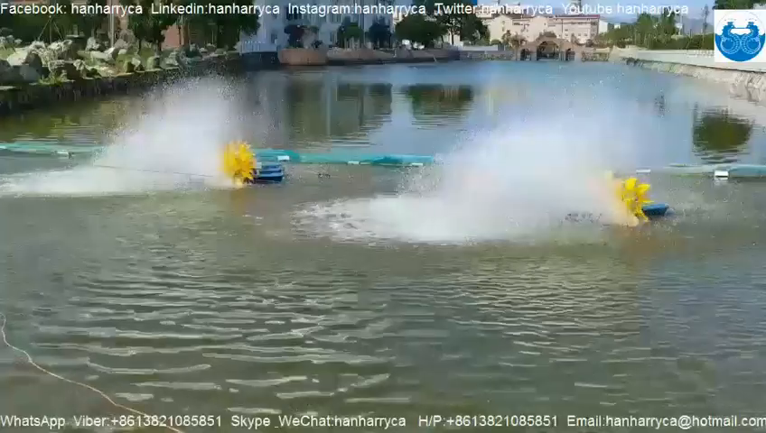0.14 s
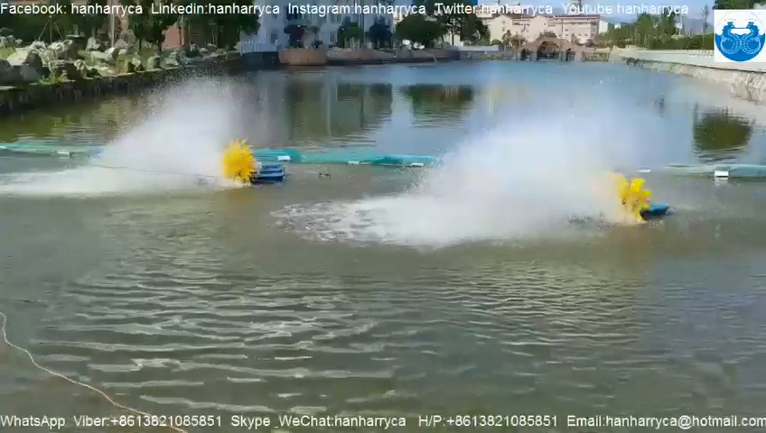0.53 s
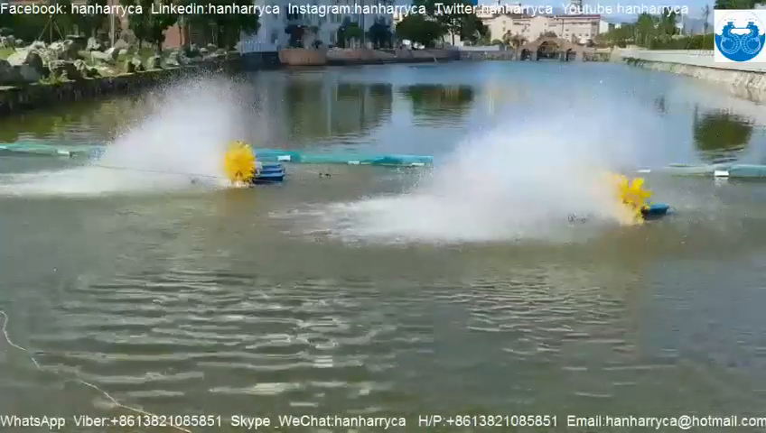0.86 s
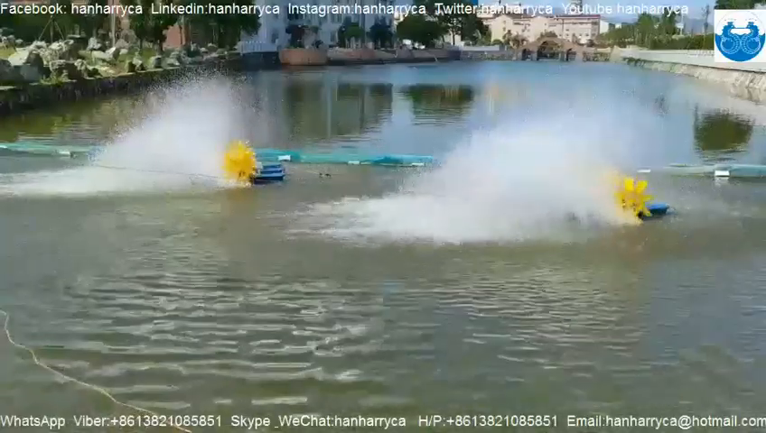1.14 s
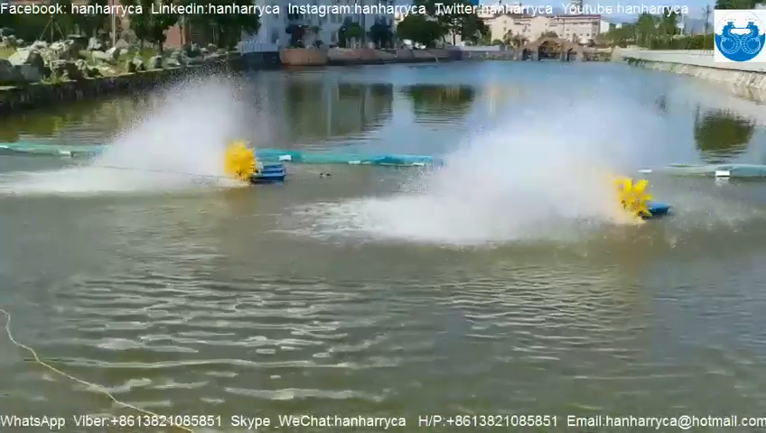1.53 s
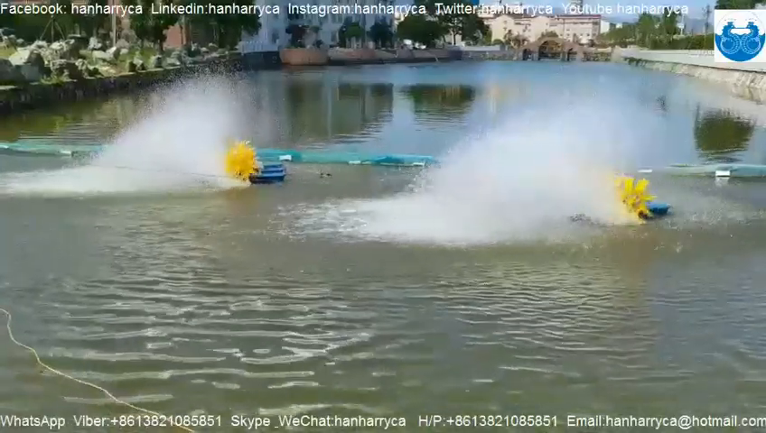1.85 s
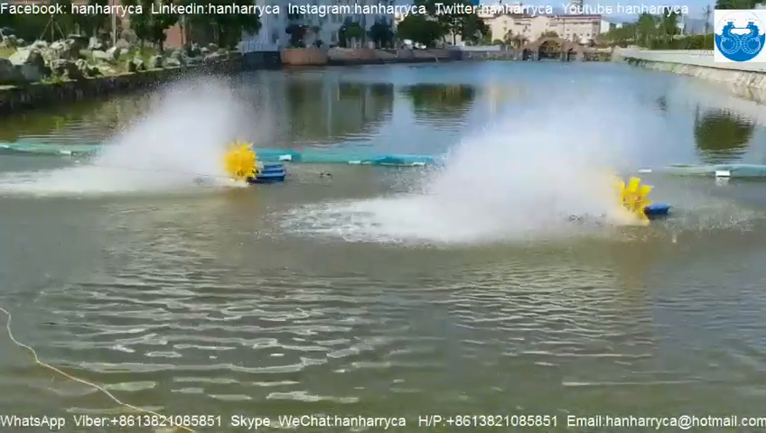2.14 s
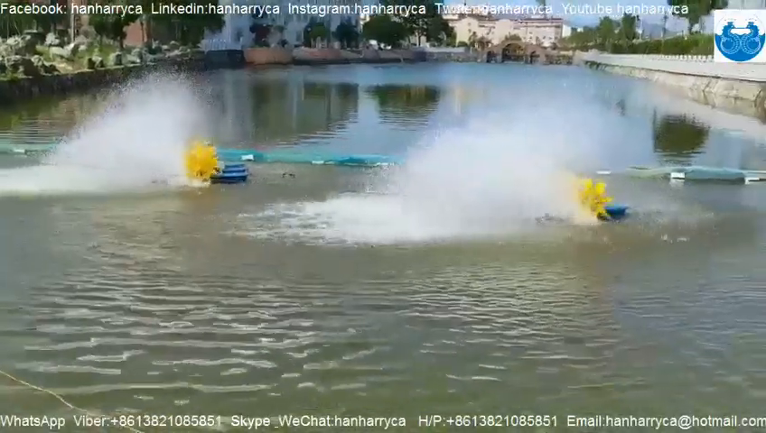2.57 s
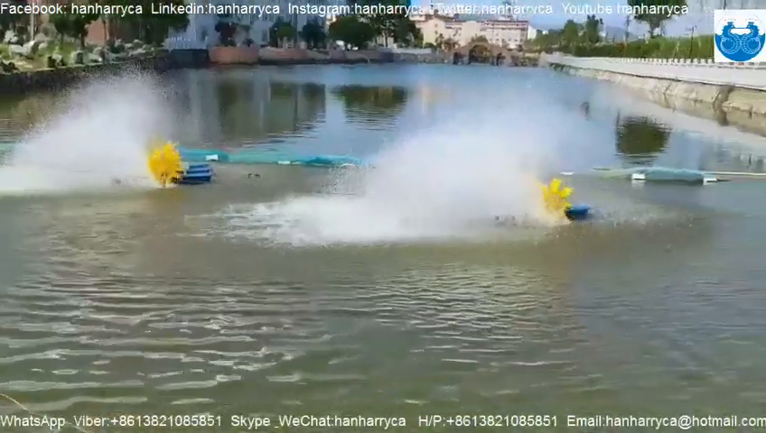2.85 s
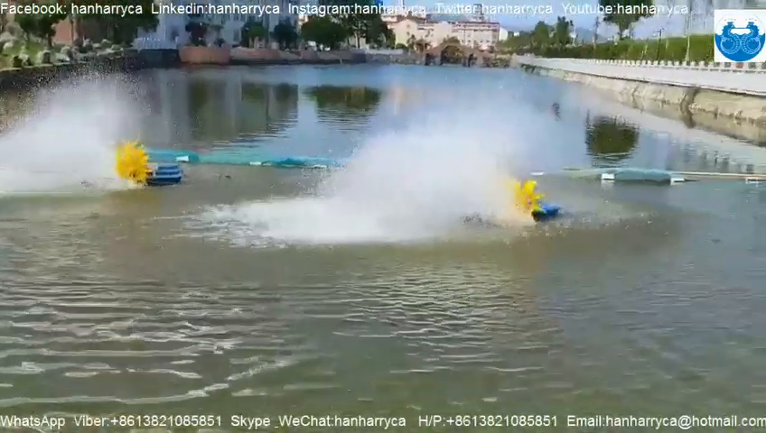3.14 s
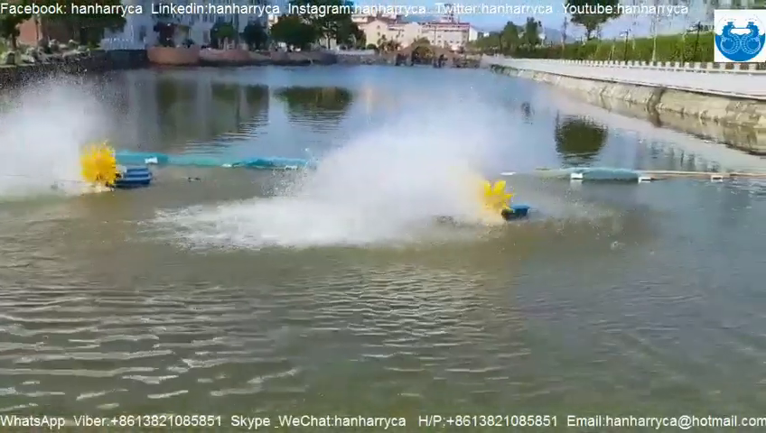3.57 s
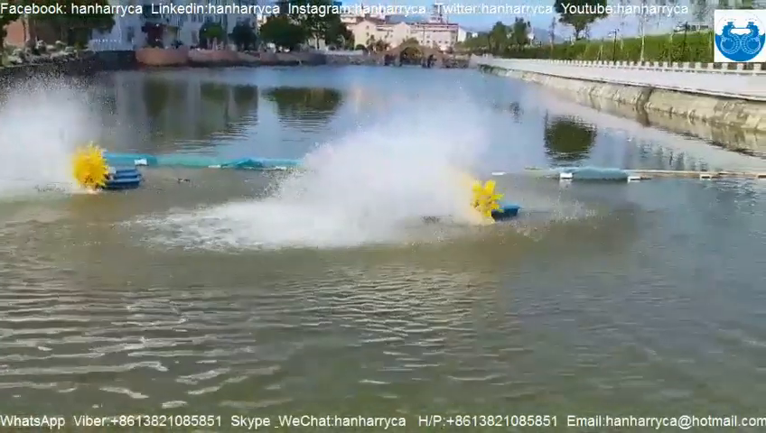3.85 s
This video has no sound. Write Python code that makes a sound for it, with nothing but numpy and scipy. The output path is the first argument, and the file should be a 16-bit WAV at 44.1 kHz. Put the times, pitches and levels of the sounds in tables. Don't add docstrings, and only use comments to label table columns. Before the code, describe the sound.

Splashing water from two paddle wheels: near silence until about 0.25 s, then a quick fade-in by 0.33 s to a dense, wide, bright hiss of falling spray. It is loudest at first, easing down until about 1.5 s, then holding steady with small flutters to 4 s. Fine drop ticks, ringing bubbles and hollow mid-pitched churning mingle over low wash and very faint motor hum, outdoors, a few metres away.

```python
import sys
import numpy as np
from scipy import signal
from scipy.fft import rfft, irfft
from scipy.io import wavfile
from scipy.ndimage import uniform_filter1d, map_coordinates

SR = 44100
rng = np.random.default_rng(int(sys.argv[2]) if len(sys.argv) > 2 else 0)


def elevation(decibels):
    levels = np.asarray(decibels, float)
    return 10 ** (levels / 20)


def inscribe(sig):
    pcm = np.round(np.clip(np.atleast_2d(sig).T, -1, 1) * 32767)
    wavfile.write(sys.argv[1], SR, pcm.astype(np.int16))


N = 176400


def rms_one(x):
    return x / np.sqrt(np.mean(x ** 2) + 1e-20)


def at_hz(points, hz):
    table_hz, value = np.transpose(points)
    return np.interp(np.log(hz), np.log(table_hz), value)


def drift(rate_hz, count=1):
    hop, warm_up = 40, 2000
    r = np.exp(-2 * np.pi * rate_hz * hop / SR)
    noise = rng.standard_normal((count, N // hop + warm_up + 2))
    slow = signal.lfilter([1], [1, -2 * r, r * r], noise)[:, warm_up:]
    rows = []
    for row in slow:
        level = rms_one(row - uniform_filter1d(row, 350))
        rows.append(np.interp(np.arange(N) / hop, np.arange(len(row)), level))
    return np.array(rows)


def resonance(x, hz, width_hz):
    r = np.exp(-np.pi * width_hz / SR)
    zeros = [(1 - r * r) / 2, 0, (r * r - 1) / 2]
    poles = [1, -2 * r * np.cos(2 * np.pi * hz / SR), r * r]
    return signal.lfilter(zeros, poles, x + 1e-18)


def placed(x, lag_ms):
    turn = np.exp(-2j * np.pi * np.fft.rfftfreq(N, 1 / SR) * lag_ms / 1000)
    return np.array([x, irfft(rfft(x) * turn, N)])


def bands(white, low_hz, count):
    edges_hz = low_hz * 2 ** (np.arange(count + 1) / 5)
    for k, (low, high) in enumerate(zip(edges_hz, edges_hz[1:])):
        sos = signal.butter(2, [low, high], "band", fs=SR, output="sos")
        yield np.sqrt(low * high), signal.sosfilt(sos, white[k % 2])


# freq_hz, density_db_per_hz
SPRAY_SPECTRUM = [(250, -5), (700, -6), (1300, 0.5), (2500, -3.5), (5000, 1.5), (8000, -0.5), (12000, -1),
                  (16000, -3.5)]
# freq_hz, share_0_to_1
DIRECT_SHARE = [(200, .6), (1000, .7), (3000, .65), (6000, .4), (15000, .25)]
# right_lag_ms, level_db
WHEEL_PLACES = [
    (.31, 0),
    (.21, -3.0),
]
# freq_hz, level_db
SIDE_TILT = [(300, -0.2), (5000, 0.1), (8000, -2), (10500, -2), (15500, -3)]


def spray(fine_db_per_oct):
    level_db, sheet_db, fleck_db, fleck_rise_db, speck_db = 3.5, 1.0, 0.94, 0.5, 1.76
    direct = []
    for _ in range(2):
        direct.append(sum(elevation(db) * placed(rng.standard_normal(N), lag_ms) for lag_ms, db in WHEEL_PLACES))
    scattered = rng.standard_normal((2, 2, N))
    white = np.concatenate([rms_one(np.array(direct)), scattered], axis=1)
    sheets, flecks, out = drift(15.0, count=2), drift(8.0, count=2), 0
    for hz, band in bands(white, 260, 31):
        share = at_hz(DIRECT_SHARE, hz)
        bright = np.log2(hz / 200) / 5
        flecks = .8 * flecks + .6 * drift(8.0, count=2)
        swing_db = sheet_db * sheets * bright + (fleck_db + fleck_rise_db * bright) * flecks
        swing_db = swing_db + speck_db * drift(27.0, count=2)
        colour_db = at_hz(SPRAY_SPECTRUM, hz) + fine_db_per_oct * np.log2(hz / 4500)
        colour_db = colour_db + at_hz(SIDE_TILT, hz) / 2 * np.array([[1], [-1]])
        mix = np.sqrt(share) * band[:2] + np.sqrt(1 - share) * band[2:]
        out = out + elevation(colour_db + swing_db) * mix
    return elevation(level_db) * rms_one(out)


def ripples(x):
    delay_ms, sway_ms, sway_hz, echo_db = 5.5, .22, 3.0, -9
    lag_ms = delay_ms * np.array([[1], [1.25]]) + sway_ms * drift(sway_hz, count=2)
    lag = lag_ms * SR / 1000
    echo = [map_coordinates(side, [np.arange(N) - late], order=3) for side, late in zip(x, lag)]
    return (x + elevation(echo_db) * np.array(echo)) / np.sqrt(1 + elevation(2 * echo_db))


# freq_hz, width_hz, level_db
ECHO_RINGS = [
    (505, 190, -5),
    (922, 132, -1),
    (1411, 250, -6.5),
    (2274, 680, -8.5),
    (3230, 210, -18),
]


def churn():
    level_db, patchy_db = -7, 1.76
    out = 0
    for k, (hz, width_hz, db) in enumerate(ECHO_RINGS):
        pole_hz = 1.54 * width_hz
        ring = resonance(resonance(rng.standard_normal(N), hz, pole_hz), hz, pole_hz)
        out = out + (-1) ** k * elevation(db + patchy_db * drift(18.0)[0]) * ring
    return elevation(level_db) * rms_one(out)


def grains(per_s, cycles, low_hz, high_hz, count):
    sizes = elevation(3.5 * np.minimum(rng.exponential(1, (2, N)), 4)) * rng.choice([-1, 1], (2, N))
    born = rng.random((2, N)) < per_s * elevation(4.0 * drift(9.0, count=2)) / SR
    dealt = rng.integers(0, count, (2, N))
    out = 0
    for k, hz in enumerate(np.geomspace(low_hz, high_hz, count)):
        clicks = sizes * born * (dealt == k)
        out = out + resonance(clicks, hz, 2 * hz / cycles) * np.sqrt(cycles / hz)
    return rms_one(out)


def drops():
    return elevation(-14) * grains(per_s=4000, cycles=6.0, low_hz=2500, high_hz=14000, count=10)


def bubbles():
    both = elevation(-10) * grains(per_s=110, cycles=75, low_hz=850, high_hz=7500, count=50)
    return .6 * both + .4 * placed(both[0], WHEEL_PLACES[0][0])


# freq_hz, density_db_per_hz
WASH_SPECTRUM = [(18, -38), (30, -1.5), (59, 5.5), (102, -0.5), (194, 3), (259, -3.5), (296, 0),
                 (330, -18.5), (430, -40), (730, -120)]


def rumble():
    level_db, alike = -44.5, 0.99
    out = 0
    for hz, (mid, side) in bands(rng.standard_normal((2, 2, N)), 26, 19):
        stereo = np.sqrt(1 + alike) * mid + np.sqrt(1 - alike) * side * [[1], [-1]]
        out = out + elevation(at_hz(WASH_SPECTRUM, hz) + 2.4 * drift(2.5)) * stereo
    return elevation(level_db) * rms_one(out)


# freq_hz, width_hz, level_db
MOTOR_HUM = [
    (57, 7, -61),
    (74.8, 8.3, -54),
    (147, 22, -56),
    (201.7, 3.4, -59.5),
    (300.1, 10, -63.5),
]


def motors():
    out = 0
    for hz, width_hz, db in MOTOR_HUM:
        noise = rng.standard_normal(2 * N) + 0.61 * rng.standard_normal(2 * N) * [[1], [-1]]
        line = resonance(resonance(noise, hz, width_hz), hz, width_hz)
        out = out + elevation(db) * rms_one(line[:, N:])
    return out


# start_s, level_db, brightness_db_per_oct, effort_db
WATER_FLOW = [(.33, -29.5, -1.5, 0.5), (.55, -31.5, -0.5, -.5), (.75, -31, -0.5, 1), (1.0, -33, -0.5, 1),
              (1.25, -34, -0.5, -1), (1.45, -35, -1, 1), (1.7, -35, -1, 0), (1.95, -35, 0.5, 1.5),
              (2.2, -34.5, -.5, 0.5), (2.42, -36.5, -1, -0.5), (2.65, -33.5, -.5, 0.5), (2.85, -34, -.5, 0),
              (3.1, -34.5, -1, -1), (3.35, -34.5, -1, -0.5), (3.6, -34.5, -1, 0), (3.8, -35, 0, 0.5),
              (4.0, -34, -1.5, -3)]


def scene():
    start_s, *columns = np.transpose(WATER_FLOW)
    flow_db, fine_db_per_oct, effort_db = [np.interp(np.arange(N) / SR, start_s, c) for c in columns]
    swing_db = flow_db - flow_db.mean()
    water = elevation(flow_db) * (ripples(spray(fine_db_per_oct) + drops()) + bubbles())
    wash = elevation(flow_db.mean() + .8 * swing_db + effort_db) * churn()
    low = elevation(0.82 * swing_db + effort_db) * (rumble() + motors())
    return water + wash + low


def low_pass(x):
    return signal.sosfilt(signal.butter(12, 15760, fs=SR, output="sos"), x)


# freq_hz, width_hz,
# gain_db
TONE_DIPS = [(350, 90, -2.5), (750, 150, -3), (6350, 1000, -4.5), (8300, 800, -8), (8850, 900, -4),
             (13300, 900, -3), (14100, 1200, -2.5)]


def record(dry):
    t_s = np.arange(N) / SR
    x = signal.sosfilt(signal.butter(2, 49, "high", fs=SR, output="sos"), dry)
    for hz, width_hz, db in TONE_DIPS:
        x = x + (elevation(db) - 1) * resonance(x, hz, width_hz)
    presence_hz, presence_width_hz, presence_db_per_s = 4470, 1200, 0.67
    presence_db = presence_db_per_s * (t_s - N / 2 / SR)
    x = x + (elevation(presence_db) - 1) * resonance(x, presence_hz, presence_width_hz)
    fade_start_s, fade_s, fade_curve = .2555, 0.076, 0.89
    lead_start_s, lead_rise_s, lead_db = .230, .011, -28
    fade = np.clip((t_s - fade_start_s) / fade_s, 0, 1) ** fade_curve
    fade += elevation(lead_db) * np.clip((t_s - lead_start_s) / lead_rise_s, 0, 1) ** 2
    return low_pass(x * fade)


dry = scene()
out = record(dry)
inscribe(out)
```